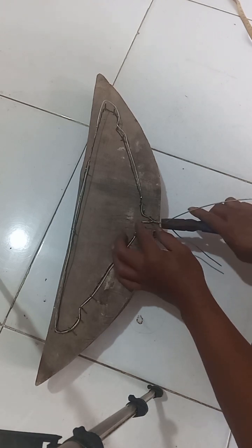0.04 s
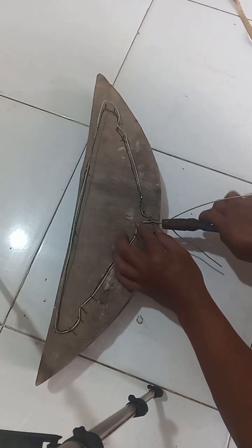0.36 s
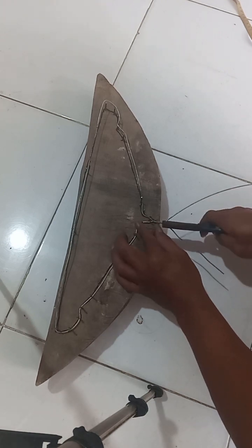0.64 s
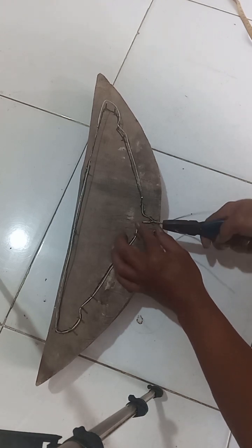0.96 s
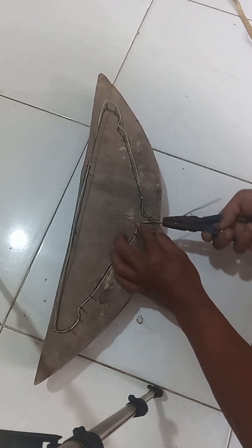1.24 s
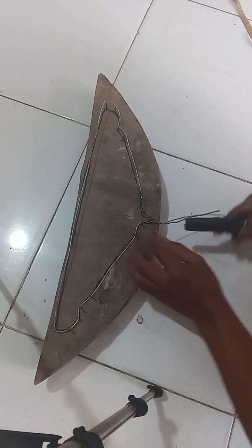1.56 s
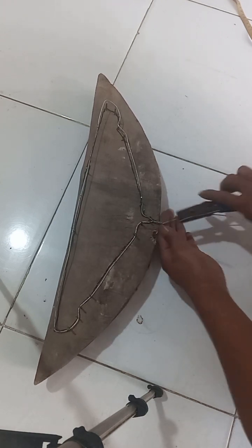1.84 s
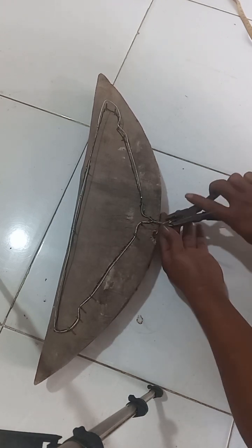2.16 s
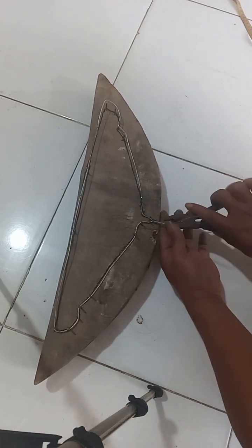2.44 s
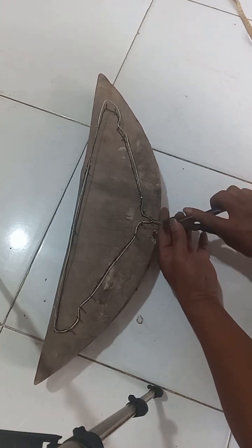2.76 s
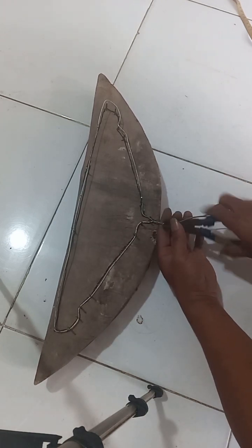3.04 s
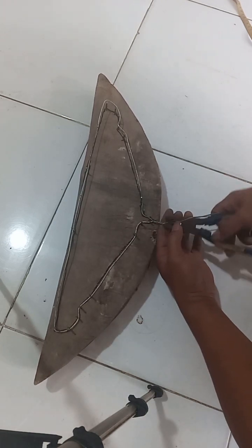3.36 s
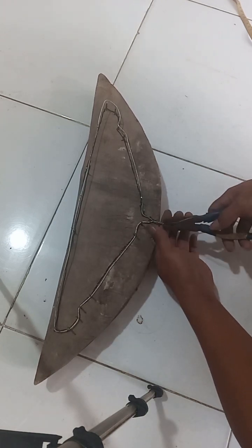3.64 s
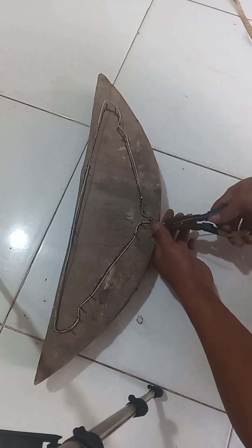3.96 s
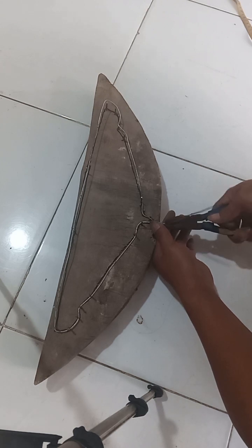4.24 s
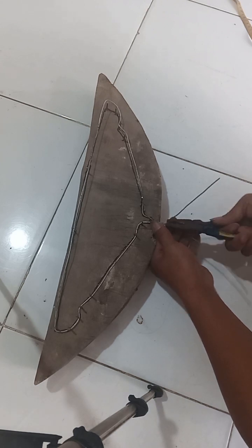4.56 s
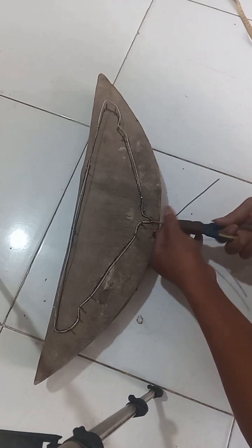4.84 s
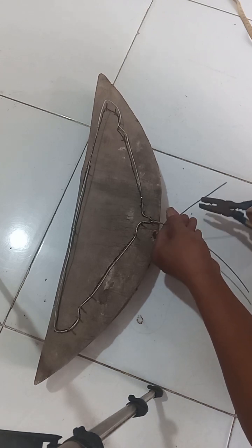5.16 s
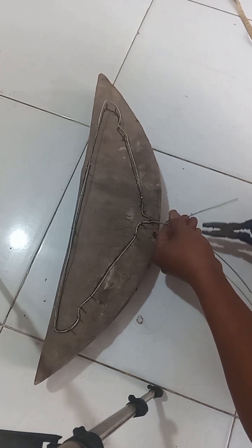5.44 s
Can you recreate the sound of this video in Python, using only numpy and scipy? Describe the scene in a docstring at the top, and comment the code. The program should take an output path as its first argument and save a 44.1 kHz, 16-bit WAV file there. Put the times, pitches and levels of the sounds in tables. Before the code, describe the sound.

Over room hiss and the quiet, rhythmic swish of a fan, nearby pliers tick and squeak against steel wire, then cut it with a sharp crack and a brief metallic ring. The jaws keep clinking in little clusters, with faint scrapes and soft thumps and a short room echo. A motorbike puttering far outside draws closer, rumbles through the room toward the end and moves away.

```python
"""From the start a fan swishes about four times a second over room air and a steady hiss, while a
small motorbike putters far off outside. Pliers work steel wire on a tiled floor: contact sets the jaws
clinking, friction makes small scrapes, and stick-slip a thin squeak. Near 1.2 s the wire is cut with one
loud snap and the steel rings; dull bumps of the hands and more clinks follow. Near 4 s the motorbike
passes, its exhaust pulses booming in the low resonances of the room, and then it recedes."""
import sys
import numpy as np
from scipy import signal
from scipy.fft import rfft, irfft, next_fast_len
from scipy.io import wavfile
from scipy.ndimage import map_coordinates

SR = 44100
rng = np.random.default_rng(int(sys.argv[2]) if len(sys.argv) > 2 else 0)


def waveform_to_disk(signal):
    """Save audio, clipped to [-1, 1], as 16-bit WAV at the path in sys.argv[1]."""
    frames = np.transpose(np.atleast_2d(signal))
    scaled = np.clip(frames, -1, 1) * 32767
    samples = np.round(scaled).astype(np.int16)
    wavfile.write(sys.argv[1], SR, samples)


N = 242991
TIME = np.arange(N) / SR
HIT = TIME[:SR // 2]  # time axis of one short event

# spectrum of room air and of road noise: f/Hz, relative spectral level/dB
AIR_SPECTRUM = [(20, -19), (45, -26), (75, -11), (115, -11), (180, -0.5), (240, -7.5), (310, -6.5),
                (520, -12), (630, -9.5), (1040, -14), (1270, -12.5), (1800, -17.5), (3700, -23.5),
                (6000, -23), (8000, -46)]


def amp(db):
    """Amplitude ratio of a level in decibels."""
    return 10 ** (np.asarray(db) / 20)


def unit(x):
    """Normalisation to rms 1."""
    return x / np.sqrt(np.mean(x ** 2) + 1e-20)


def along(points, hz):
    """Interpolation of (f/Hz, value) points on a logarithmic frequency axis."""
    f, v = np.transpose(points)
    return np.interp(np.log(hz + 1), np.log(f + 1), v)


def curves(rows):
    """Linear interpolation of each column after t/s to one value per sample."""
    s, *cols = np.transpose(rows)
    return [np.interp(TIME, s, c) for c in cols]


def wobble(rate):
    """Smooth random modulation: a spline through rate knots a second."""
    return map_coordinates(rng.standard_normal(int(N * rate / SR) + 4), [TIME * rate])


def fade(t, t60):
    """Exponential decay, 60 dB down after t60."""
    return np.exp(-np.log(1000) * t / t60)


def rise(tau):
    """Exponential approach to 1 with time constant tau."""
    return 1 - np.exp(-HIT / tau)


def add(track, s, sound):
    """Superposition of a sound on the track at time s."""
    part = track[max(round(s * SR), 0):][:len(sound)]
    part += sound[:len(part)]


def filtered(x, response):
    """Linear filtering: the spectrum of x times a complex frequency response."""
    m = next_fast_len(len(x) + SR // 2)
    return irfft(rfft(x, m) * response(np.fft.rfftfreq(m, 1 / SR)), m)[:len(x)]


def noise(spectrum):
    """Stationary noise of rms 1 with a given spectral shape."""
    return unit(filtered(rng.standard_normal(N), lambda hz: amp(along(spectrum, hz))))


def resonant(x, modes):
    """Forced response, at rms 1, of modes (f/Hz, bandwidth/Hz, level/dB) of alternating sign."""
    def response(f):
        return sum((-1) ** k * amp(db) * 1j * f * width / (hz * hz - f * f + 1j * f * width)
                   for k, (hz, width, db) in enumerate(modes))
    return unit(filtered(x, response))


def cascade(x, modes):
    """Two resonant stages in series pass little between the peaks."""
    return resonant(resonant(x, modes), modes)


def in_room(x, wet_db, echo_db):
    """Direct sound, one wall reflection and a diffuse reverberant tail."""
    # reverberation time of the room: f/Hz, t60/s
    reverberation = [(300, 0.3), (1700, 0.23), (6000, 0.19), (10000, 0.19), (15000, 0.12)]
    hz, t, spectra = signal.stft(rng.standard_normal(len(HIT)), SR, nperseg=256)
    spectra = spectra * fade(t, along(reverberation, hz)[:, None])
    tail = signal.istft(spectra, SR, nperseg=256)[1][:len(HIT)] * rise(0.0012)
    out = x + amp(wet_db) * signal.fftconvolve(x, tail / np.linalg.norm(tail))[:len(x)]
    add(out, 0.0125, amp(echo_db) * x)
    return out


def background():
    """Broadband noise: room air and a high hiss, each with slight random amplitude modulation."""
    # spectrum of the hiss: f/Hz, relative spectral level/dB
    hiss_spectrum = [(3000, -46), (5200, -25), (6300, -4), (7100, 2), (7900, -17), (8800, -18), (9500, -6),
                     (10400, -14), (11200, -23.5), (13300, -29), (14700, -18.5), (15700, -12)]
    # slow course of the hiss: t/s, level/dB
    hiss_levels = [(0.0, -59), (1.47, -55), (1.72, -58.5), (4.24, -58.5), (5.51, -62.5)]
    hiss_db, = curves(hiss_levels)
    air = amp(-55.5 + 0.99 * wobble(9)) * noise(AIR_SPECTRUM)
    hiss = amp(hiss_db + 1.94 * wobble(36)) * noise(hiss_spectrum)
    return air + hiss


def fan():
    """Rotation modulates air noise and blade and housing modes: a strong and a weak swish each turn."""
    # spectrum of the rushing air: f/Hz, relative spectral level/dB
    swish_spectrum = [(150, -31), (300, -21), (1100, 2), (2200, 0), (2700, -2.5), (3350, -1.5), (4200, -10),
                      (6800, 1), (8200, -18), (9700, -9), (12000, -26)]
    # modes of the blades and housing: f/Hz, bandwidth/Hz, relative level/dB
    fan_modes = [(393, 11.7, -0.5), (499.4, 6.2, 0), (618, 11, 1), (797.6, 16, -5.5), (904.6, 14, -0.5),
                 (2035, 24, -7), (3244, 45, -10.5)]
    # turns that swish harder or softer than the rest: t/s, level change/dB
    uneven_turns = [(.28, 3), (.54, 3), (.79, -14), (1.82, 2), (2.33, -2), (3.37, 0)]
    period_s, first_s = 0.2586, 0.012
    sharpness, backswish_db, hum = 6.7, -16, 0.22  # hum: the part of the ring that never stops
    turn = (TIME - first_s) / period_s
    facing = np.cos(np.pi * turn) ** 2
    uneven_db = sum(db * (np.round(turn) == round((s - first_s) / period_s)) for s, db in uneven_turns)
    swell = amp(uneven_db) * facing ** sharpness + amp(backswish_db) * (1 - facing) ** sharpness
    rush = amp(-52.5) * noise(swish_spectrum)
    body = amp(-54) * resonant(rng.standard_normal(N), fan_modes)
    return swell * rush + (swell + hum) * body


def nearness(s):
    """Inverse-distance law for a source passing at steady speed; the gain is 1 at time s."""
    distance_m, speed_m_per_s = 4.13, 7.77
    return distance_m / np.hypot(distance_m, speed_m_per_s * (TIME - s))


def exhaust(near):
    """An uneven train of exhaust pulses drives the room modes; the boom wavers more while far off."""
    # engine firing: t/s, rate/Hz
    firing_rates = [(0, 23.2), (3.3, 20.8), (4.05, 21.2), (4.5, 20.5), (4.9, 19.8), (5.3, 18.6)]
    # boom as the tailpipe swings into view, before approach and waver: t/s, low level/dB, upper level/dB
    boom_levels = [(3.4, -57, -64), (3.84, -62.5, -64), (3.94, -54.5, -48), (4.08, -45, -49),
                   (4.17, -49, -51), (4.28, -38, -41), (4.36, -43, -46), (4.46, -39.5, -47),
                   (4.62, -48, -52.5), (4.85, -55, -53), (5.02, -57, -60), (5.25, -54.5, -50.5),
                   (5.51, -57, -54)]
    # low room modes: f/Hz, bandwidth/Hz, relative level/dB
    low_modes = [(58.7, 11, -7), (77.5, 6.6, -1.5), (105.2, 13.6, 2)]
    # upper room modes: f/Hz, bandwidth/Hz, relative level/dB
    upper_modes = [(119.7, 8.4, -5.5), (140.7, 15.3, 1), (291.5, 14, -7)]
    rate, = curves(firing_rates)
    low_db, upper_db = curves(boom_levels)
    approach_db = 1.85 * np.minimum(TIME - boom_levels[0][0], 0)  # grows until the first listed time
    waver_db = 2.5 * (1 - near) * wobble(10)
    cycles = np.cumsum(rate) / SR + 0.03 * wobble(20)
    firings = np.diff(np.floor(np.abs(cycles)), prepend=0)  # one impulse a cycle
    pulses = unit(firings * amp(1.4 * rng.standard_normal(N)))
    drive = pulses + 0.15 * rng.standard_normal(N)
    low = amp(low_db) * cascade(drive, low_modes)
    upper = amp(upper_db) * cascade(drive, upper_modes)
    return amp(approach_db + waver_db) * (low + upper)


def motorbike():
    """A passing source with directivity: the machinery radiates forward, the tailpipe's rush backward."""
    # resonances of the machinery: f/Hz, bandwidth/Hz, relative level/dB
    whirr_modes = [(255.7, 3.4, 12), (298.6, 8.4, 14.5), (550, 44, -3), (1255, 30, 7), (2247, 100, -3),
                   (2690, 235, -4), (6280, 500, -5.5)]
    pass_s, whirr_lead_s, behind_s = 4.09, 0.21, 4.63
    drone_hz, drone_s, drone_width_s = 181.7, 3.89, 0.25
    near = nearness(pass_s)
    boom = exhaust(near)
    swell = np.exp(-((TIME - drone_s) / drone_width_s) ** 2)
    drone = amp(-50.5) * swell * np.sin(2 * np.pi * drone_hz * TIME + 0.35 * wobble(15))
    ahead = nearness(pass_s - whirr_lead_s) ** 1.2
    whirr = amp(-52) * ahead * resonant(rng.standard_normal(N), whirr_modes)
    road = amp(-53) * near * noise(AIR_SPECTRUM)
    behind = 0.5 + 0.5 * np.tanh(2 * (TIME - behind_s))
    rush = amp(-55.5) * behind * cascade(rng.standard_normal(N), [(346, 380, 0)])
    return boom + drone + whirr + road + rush


def jaw_ring(hz, db, length):
    """Free vibration of the jaws' lowest mode: a strong clink rings clean, a weak one only rasps."""
    twin_ratio, twin_db = 1.065, -9  # the second jaw is a little higher and weaker
    firm_db, light_db = -23.5, -36
    twin = amp(twin_db) * np.sin(2 * np.pi * (twin_ratio * hz * HIT + rng.random()))
    pair = np.sin(2 * np.pi * hz * HIT) + twin
    rasp = cascade(rng.standard_normal(len(HIT)), [(hz, 290, 0)])
    lightness = np.clip((firm_db - db) / (firm_db - light_db), 0, 1)
    tone = np.sqrt(1 - lightness) * pair + np.sqrt(lightness / 2) * rasp
    decay = fade(HIT, 0.77 * length) + amp(-28) * fade(HIT, 0.23)  # a faint part lingers
    return amp(db) * tone * decay * rise(0.088 * length) ** 2


def chafe(modes, t60):
    """Random excitation of damped modes by a brief rough contact; a longer one starts more softly."""
    return resonant(rng.standard_normal(len(HIT)), modes) * fade(HIT, t60) * rise(0.021 * t60)


def clinks():
    """Contact excitation and reflection: the jaws clink at a pitch set by the grip; the wall echoes."""
    # clinks of the jaws and their strongest wall echoes:
    # t/s, length/s, ring f/Hz, ring level/dB, jaw level/dB, edge level/dB, favoured jaw f/Hz
    clinks_and_echoes = [(0.2205, 0.056, 1676, -33.5, -56, -57, 6000),
                         (0.934, 0.075, 1873, -38, -52, -58, 6000),
                         (0.994, 0.046, 1440, -48, -45, -46.5, 7200),
                         (1.365, 0.1, 1606, -31.5, -43, -64, 6000),
                         (1.429, 0.043, 1560, -49, -38, -56, 5900),
                         (1.448, 0.046, 1540, -42, -24.5, -44.5, 6040),
                         (1.46, 0.044, 1510, -34, -24, -43, 5800),
                         (1.4755, 0.03, 1560, -39, -32, -52, 5400),
                         (1.722, 0.062, 1890, -35.5, -63, -65, 6000),
                         (1.928, 0.043, 1530, -31.5, -49, -50, 5200),
                         (1.9485, 0.047, 1594, -24, -47, -55, 5200),
                         (1.996, 0.032, 1598, -32, -36, -37, 5600),
                         (1.9985, .04, 1588, -20, -40, -44, 4700),
                         (2.011, .055, 1611, -25.5, -41.5, -44, 4900),
                         (2.103, 0.038, 1575, -24, -31.5, -47, 6700),
                         (2.2474, 0.026, 1770, -32, -37.5, -43.5, 7300),
                         (2.6796, 0.041, 1710, -26.5, -48, -62, 5600),
                         (2.694, 0.02, 1761, -18, -28, -44, 5100),
                         (2.705, 0.019, 1756, -30, -30, -43.5, 5260),
                         (3.505, 0.088, 1710, -35, -52, -61, 6000)]
    # higher modes of the jaws: f/Hz, bandwidth/Hz, relative level/dB
    jaw_modes = [(2120, 90, 3), (3910, 80, -2.5), (4840, 87, -2), (5154, 60, 4), (5805, 56, 4.5),
                 (6000, 42, 6), (6240, 49, 3.5), (7070, 91, 3), (7730, 110, -8)]
    # modes of the cutting edges: f/Hz, bandwidth/Hz, relative level/dB
    edge_modes = [(9310, 150, 3), (9700, 200, 1.5), (10060, 250, -0.5), (10560, 200, -4), (11650, 250, -17),
                  (15300, 600, -14)]
    db_per_octave = 14.5  # jaw modes weaken away from the favoured frequency
    out = np.zeros(N)
    for s, length, hz, ring_db, jaw_db, edge_db, focus_hz in clinks_and_echoes:
        low = jaw_ring(hz, ring_db, length)
        modes = [(f, width, db - db_per_octave * abs(np.log2(f / focus_hz)))
                 for f, width, db in jaw_modes]
        jaw = amp(jaw_db) * chafe(modes, t60=length)
        edge = amp(edge_db) * chafe(edge_modes, t60=0.88 * length)
        tick = amp(edge_db - 2.5) * chafe([(8300, 2200, 0)], t60=0.01)  # crisp onset of steel on steel
        add(out, s, in_room(low, wet_db=-6, echo_db=-8.5))
        add(out, s, in_room(jaw + edge + tick, wet_db=-6, echo_db=-9.5))
    return out


def housing():
    """Free decay: one lightly damped mode of the fan's housing rings on after a hard swish."""
    # rings left by the hardest swishes: t/s, level/dB
    rings = [(.25, -50), (.51, -46), (1.785, -46)]
    mode = np.sin(2 * np.pi * 908 * HIT) * rise(0.014) * fade(HIT, t60=0.53)
    out = np.zeros(N)
    for s, db in rings:
        add(out, s, amp(db) * mode)
    return out


def scrapes():
    """Sliding friction of wire and fingers drives one resonance for the length of a stroke."""
    # strokes: t/s, length/s, f/Hz, bandwidth/Hz, level/dB
    strokes = [(.27, 0.11, 503, 50, -55), (0.443, 0.046, 7000, 650, -50), (0.874, 0.045, 4000, 2000, -58.5),
               (0.983, 0.026, 7470, 700, -45.5), (1.415, 0.07, 5870, 450, -47.5),
               (1.48, 0.085, 5100, 400, -57), (1.532, 0.047, 2330, 200, -56),
               (1.573, 0.043, 9050, 1000, -51.5), (1.574, 0.041, 7360, 1500, -53),
               (1.783, 0.077, 3300, 200, -56.5), (1.952, 0.068, 2090, 140, -55.5),
               (3.079, 0.051, 4350, 500, -58), (3.904, 0.053, 260, 160, -49.5),
               (5.215, 0.07, 5230, 800, -55)]
    out = np.zeros(N)
    for s, length, hz, width, db in strokes:
        friction = rng.standard_normal(len(HIT))
        rub = unit(filtered(friction, lambda f: 1 / (1 + (2 * (f - hz) / width) ** 2)))
        stroke = np.sin(np.pi * np.clip(HIT / length, 0, 1) ** 0.63)
        add(out, s, amp(db) * in_room(rub * stroke, wet_db=-7.5, echo_db=-5))
    return out


def squeaks():
    """Stick-slip in the jaws sustains one mode of the wire; uneven slips roughen its level and phase."""
    # squeaks of the wire: t/s, length/s, f/Hz, level/dB
    slips = [(0.538, 0.056, 3565, -51), (0.56, 0.071, 3130, -56), (0.565, 0.075, 4470, -64),
             (0.591, 0.11, 3570, -59), (0.614, 0.053, 3137, -53)]
    rough_db, jitter_rad, flutter_per_s = 3, 0.3, 173
    out = np.zeros(N)
    for s, length, hz, db in slips:
        grip = wobble(flutter_per_s)[:len(HIT)]
        drift = wobble(flutter_per_s)[:len(HIT)]
        tone = amp(rough_db * grip) * np.sin(2 * np.pi * hz * HIT + jitter_rad * drift)
        stroke = np.sin(np.pi * np.clip(HIT / length, 0, 1))
        add(out, s, amp(db) * in_room(tone * stroke, wet_db=-8, echo_db=-20))
    return out


def ring(modes, t60, scatter_db):
    """Modal superposition: struck modes (f/Hz, level/dB) decay, with scattered levels and phases."""
    chance = rng.standard_normal((len(modes), 2))
    hz, db = np.transpose(modes)
    gains = amp(db + scatter_db * chance[:, 0])
    partials = np.sin(2 * np.pi * (np.outer(hz, HIT) + chance[:, 1:]))
    return gains / np.linalg.norm(gains) @ partials * fade(HIT, t60)


def snap():
    """Fracture and reflection: the wire cracks, the freed steel rings, the sound slaps off the wall."""
    # cracks of the wire, then their slap off the wall: t/s, level/dB, t60/s
    cracks_and_slap = [(1.171, -40.5, 0.015), (1.175, -18, 0.021), (1.1765, -11, 0.018),
                       (1.1895, -20, 0.015)]
    # spectrum of the cracks and their slap: f/Hz, relative spectral level/dB
    crack_spectrum = [(450, -39.5), (640, -10), (840, -26), (1020, -37), (1170, -7.5), (1450, -10),
                      (1750, 6.5), (2200, -4), (2500, -38), (2950, -7), (3300, -18), (3650, -6.5),
                      (4700, -9), (5650, 6), (6300, 1), (7400, -3.5), (8100, -19), (9400, 0.5),
                      (11300, -24), (13300, -38), (15200, -12)]
    # modes of the cut wire and pliers: f/Hz, relative level/dB
    steel_modes = [(835, -15), (1392, -4), (1570, -3), (1622, -4), (1743, -2), (1819, -2), (1944, -6),
                   (2950, -13), (3747, -13), (4162, -4), (4322, -7), (5125, -12), (5233, -11), (5545, -3),
                   (5655, -3.5), (5835, -4.5), (6164, -10), (6500, -6), (6616, -3), (6728, -4), (6982, -8),
                   (7368, -6), (7515, -7.5), (8258, -16), (9119, -10), (9523, -8), (9755, -13)]
    release_s = 1.1755  # the cut ends spring free
    out = np.zeros(N)
    for s, db, t60 in cracks_and_slap:
        burst = noise(crack_spectrum)[:len(HIT)] * fade(HIT, t60)
        add(out, s, amp(db) * in_room(burst, wet_db=-2, echo_db=-24))
    add(out, release_s, amp(-21) * ring(steel_modes, t60=0.255, scatter_db=1) * rise(0.00053))
    return out


def bumps():
    """Soft impacts excite only low frequencies: each knock of the hands swells in one room resonance."""
    # knocks of the hands on the workpiece: t/s, f/Hz, level/dB
    knocks = [(1.216, 100, -44.5), (1.53, 110, -47), (1.85, 103, -40.5), (1.99, 80, -51.5),
              (2.735, 76, -48), (3.115, 73, -49.5)]
    length_s = 0.079
    swell = np.sin(np.pi * np.clip(HIT / length_s, 0, 1)) ** 2
    out = np.zeros(N)
    for s, hz, db in knocks:
        add(out, s, amp(db) * swell * np.sin(2 * np.pi * (hz * HIT + rng.random())))
    return out


def scene():
    """Superposition of all sources at one point, in one channel."""
    pliers = snap() + clinks() + scrapes() + squeaks() + bumps()
    return (pliers + fan() + housing() + background() + motorbike())[None]


def record(dry):
    """Band limiting: a steep low-pass removes the highest treble."""
    cutoff_hz = 15870
    return np.array([filtered(x, lambda hz: 1 / (1 + (hz / cutoff_hz) ** 200)) for x in dry])


dry = scene()
out = record(dry)
waveform_to_disk(out)
```